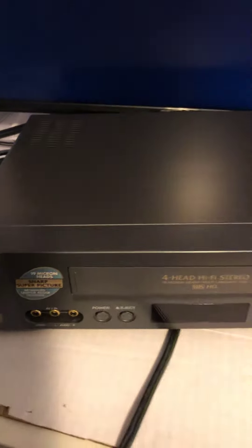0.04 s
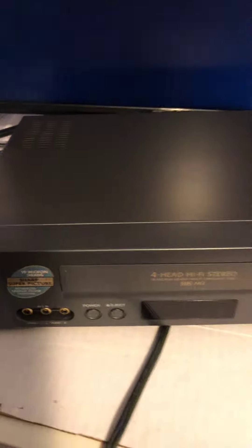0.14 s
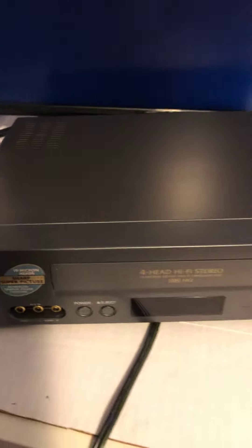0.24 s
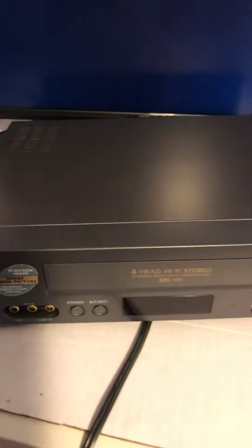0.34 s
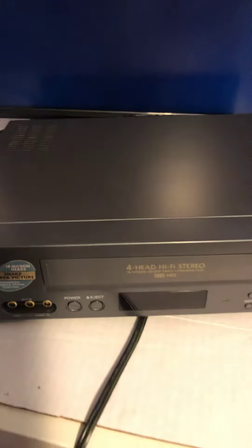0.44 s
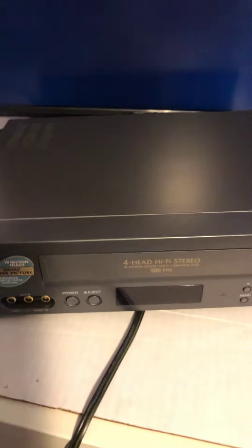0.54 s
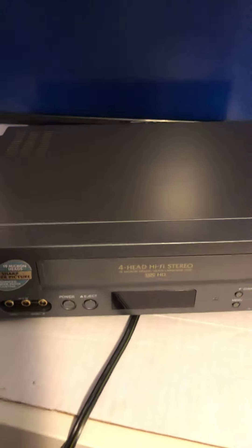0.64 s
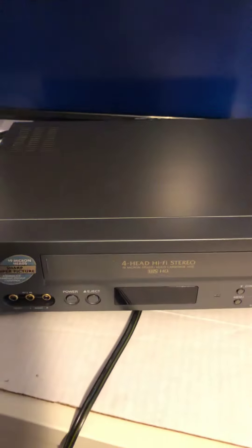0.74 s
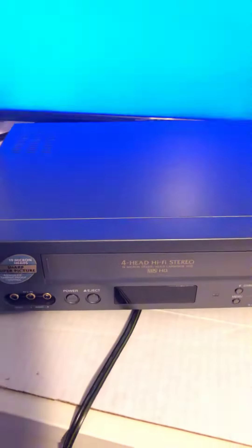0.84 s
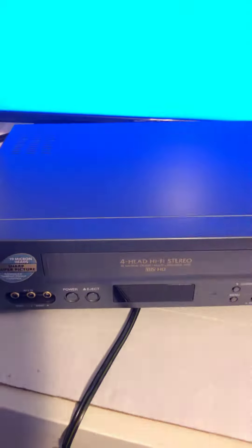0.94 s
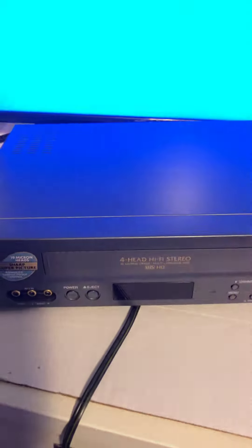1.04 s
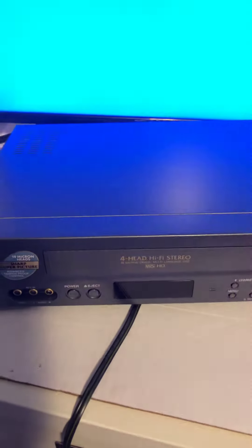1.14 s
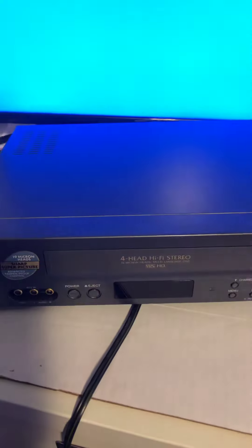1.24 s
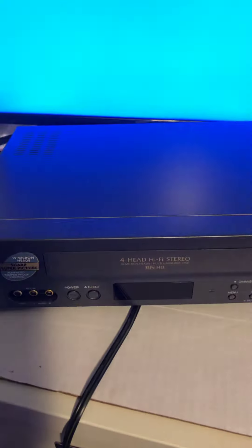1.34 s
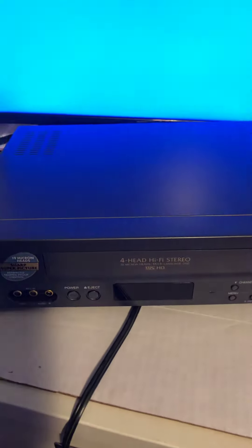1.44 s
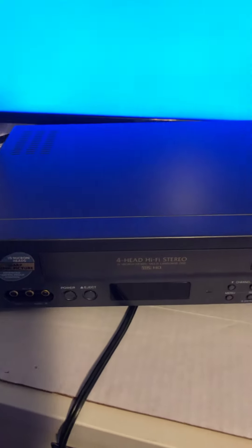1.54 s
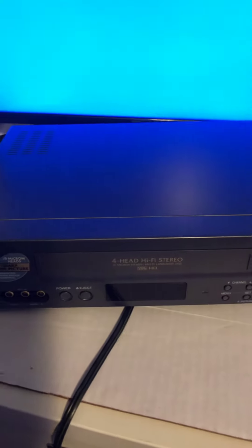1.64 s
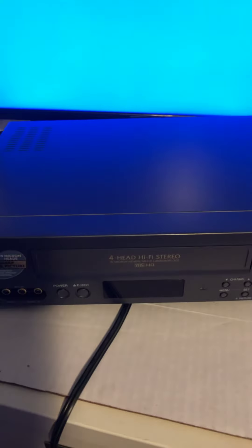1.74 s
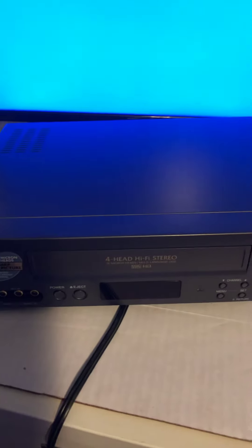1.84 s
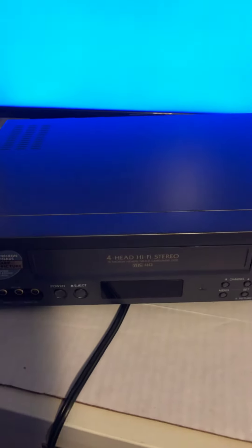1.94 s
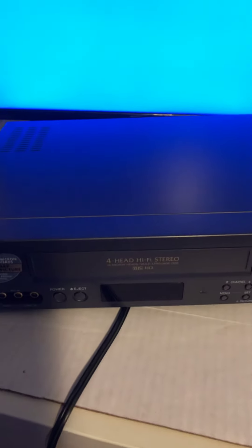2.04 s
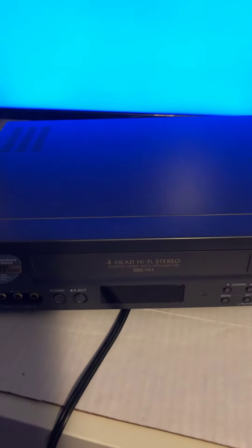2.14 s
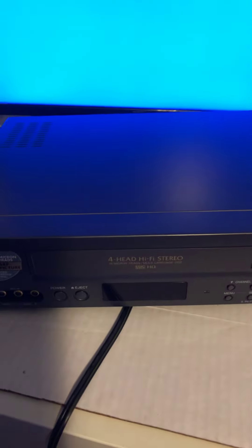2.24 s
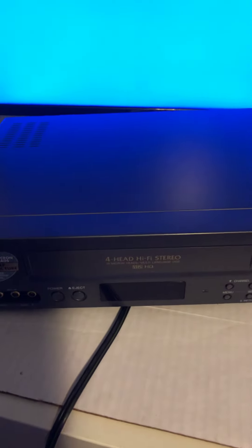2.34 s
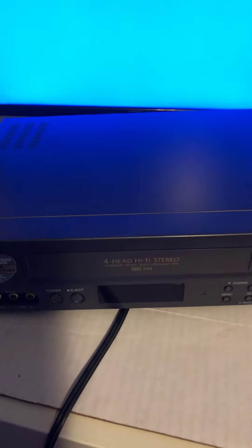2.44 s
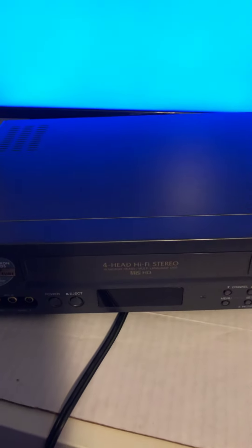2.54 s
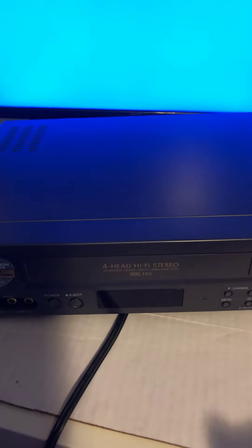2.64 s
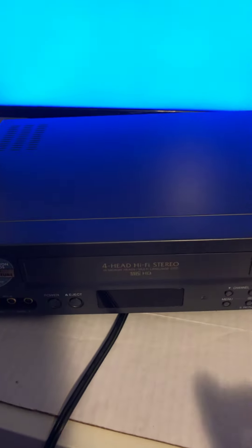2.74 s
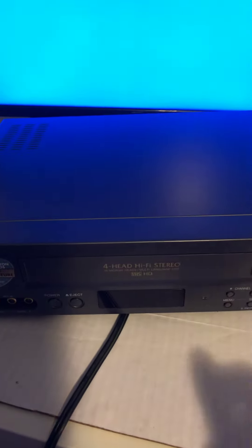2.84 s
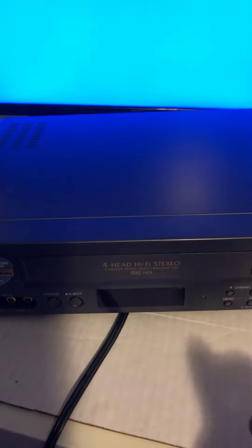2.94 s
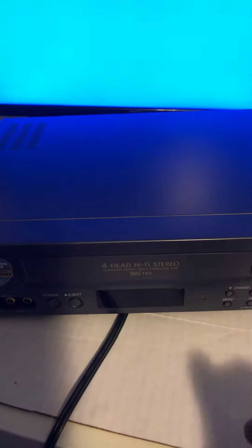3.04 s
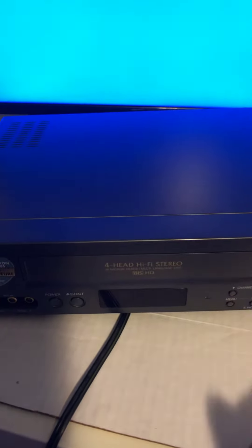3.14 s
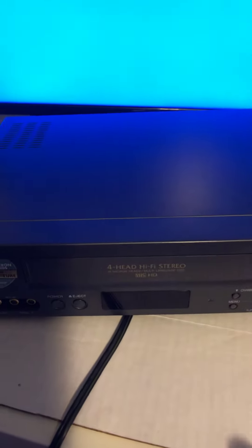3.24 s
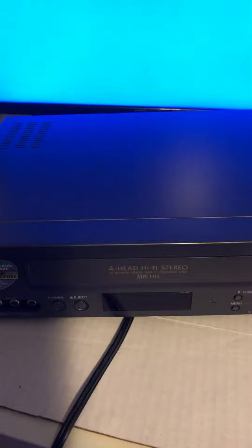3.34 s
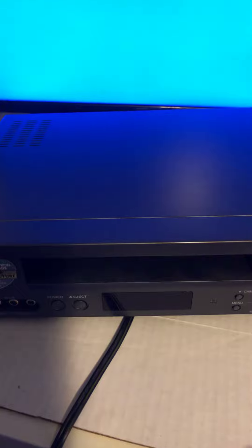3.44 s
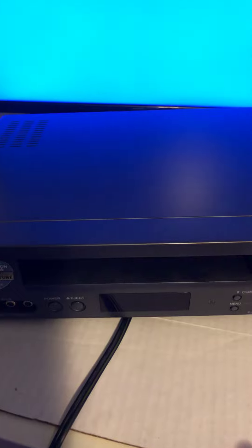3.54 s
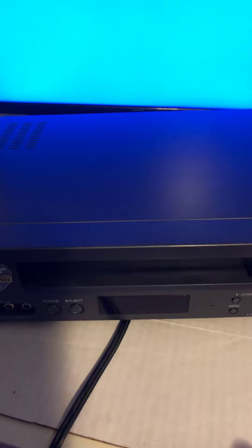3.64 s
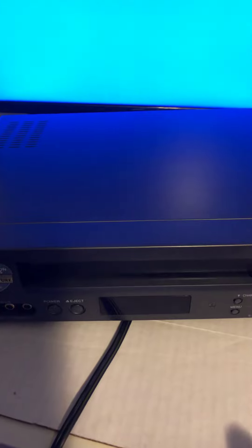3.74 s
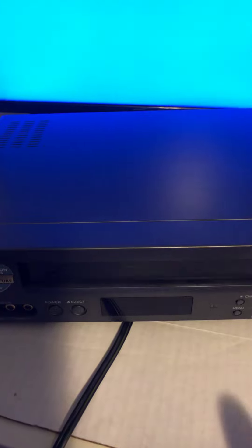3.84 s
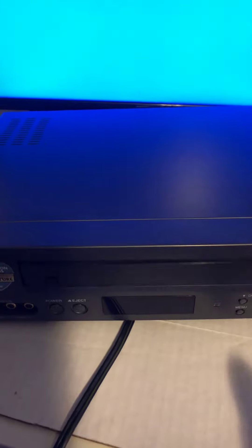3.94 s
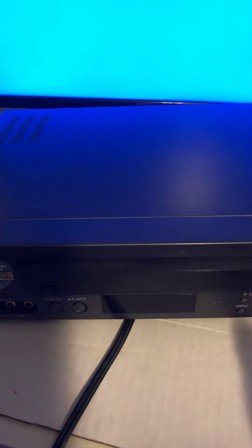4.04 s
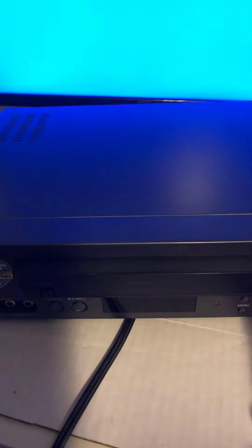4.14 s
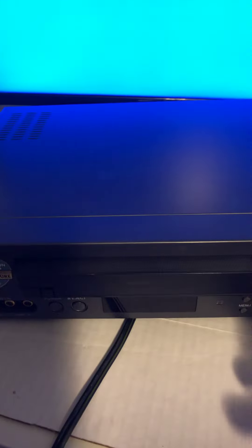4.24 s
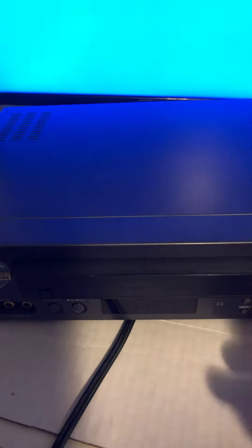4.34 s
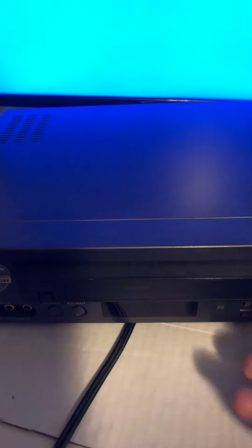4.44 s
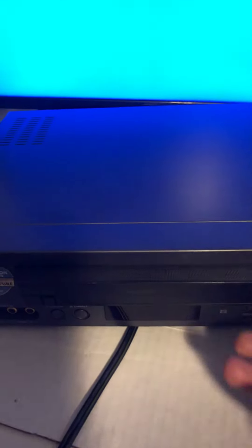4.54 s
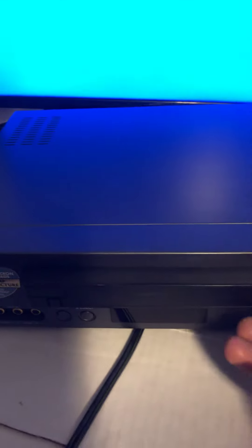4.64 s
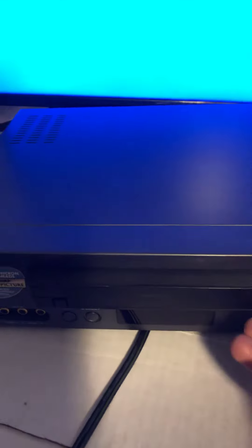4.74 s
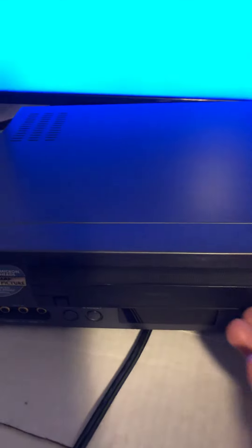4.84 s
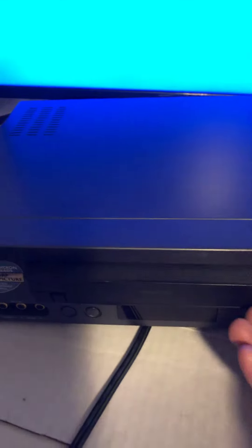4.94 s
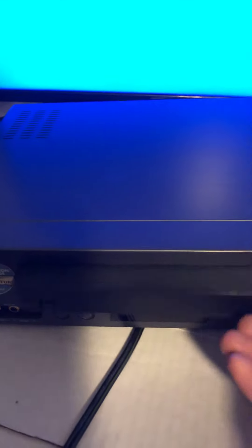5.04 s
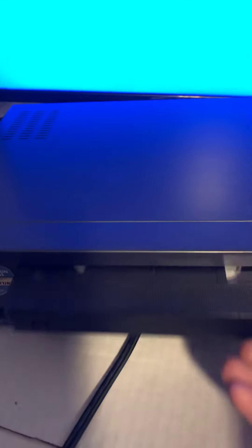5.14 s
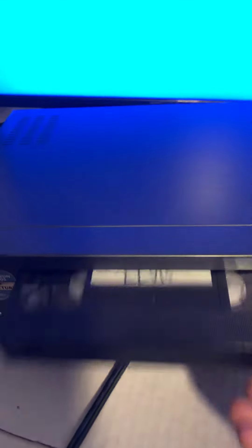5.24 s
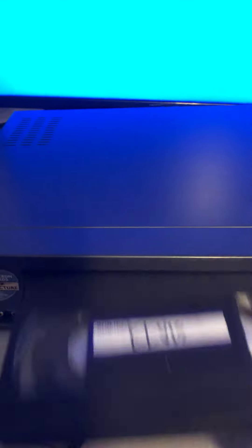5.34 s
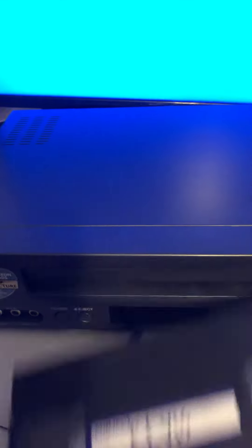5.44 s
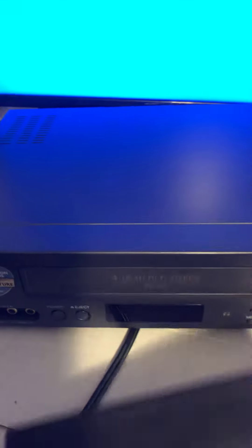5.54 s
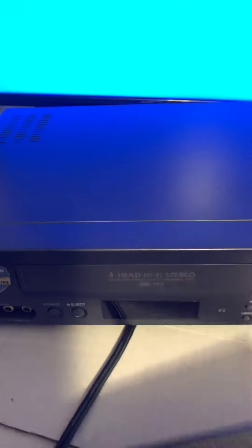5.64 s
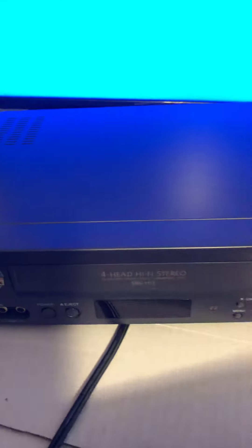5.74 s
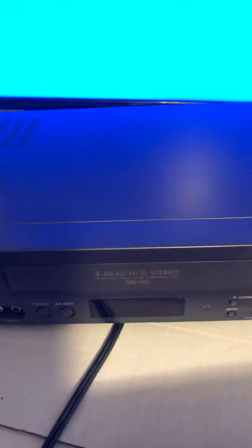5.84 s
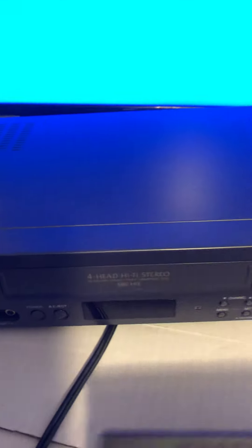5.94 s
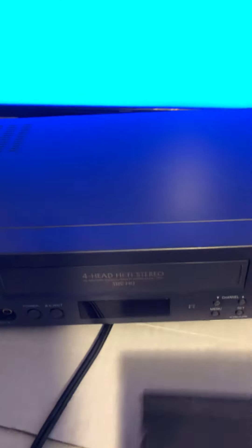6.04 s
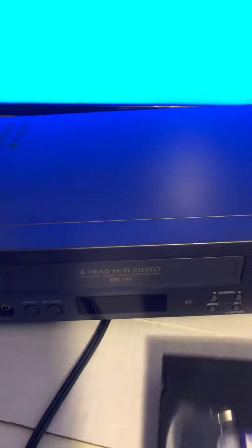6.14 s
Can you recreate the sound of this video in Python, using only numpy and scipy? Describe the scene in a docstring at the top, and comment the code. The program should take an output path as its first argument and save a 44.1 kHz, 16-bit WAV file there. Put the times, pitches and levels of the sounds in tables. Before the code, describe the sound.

A handheld microphone near a tape deck in a quiet room catches soft gear whir, small steel clicks and dull plastic knocks. The mechanism winds down, pauses, then ejects with a clatter, scraping and low thump. Another higher motor whir follows, then the cassette is dragged out and the flap cracks shut, by far the loudest moment, leaving faint hum and hiss.

```python
"""Video cassette deck ejecting

A deck unthreads its tape and ejects, over mains hum and hiss. Motors are sums of tones; gears are filtered noise.
Levers click, plastic parts knock and the door flap snaps: each blow is a chatter of taps ringing the steel chassis.
The carriage scrapes and a hand slides the cassette free: many tiny slips, each ringing the chassis briefly.
Low thumps are swells of deep noise, and a faint fuzzy tone comes near the end."""
import sys
import numpy as np
from scipy import signal
from scipy.fft import rfft, irfft
from scipy.io import wavfile
from scipy.ndimage import uniform_filter1d

SR = 44100
rng = np.random.default_rng(int(sys.argv[2]) if len(sys.argv) > 2 else 0)


def gain_from_db(level_db):
    """Turn a decibel level (scalar or array-like) into a linear amplitude factor."""
    decades = np.asarray(level_db, float) / 20
    return 10 ** decades


def transcribe(u):
    """Save the signal u as a 16-bit wav file named by the first command-line argument.

    u: samples, shape (n,) or (channels, n), limited to [-1, 1]; the rate is SR.
    q: integer samples, one column per channel.
    """
    v = np.clip(np.atleast_2d(u).T, -1, 1)
    q = np.round(v * 32767).astype(np.int16)
    wavfile.write(sys.argv[1], SR, q)


N = 272225  # length of the scene in samples


def evened(x):
    """Scales a sound to an rms of one."""
    return x / np.sqrt(np.mean(x ** 2) + 1e-20)


def read(points, hz):
    """Reads a curve of (f/Hz, value) points, straight on a log frequency scale."""
    f, value = np.transpose(points)
    return np.interp(np.log(hz + 1), np.log(f + 1), value)


def curve(rows):
    """Joins rows of (t/s, values ...) by straight lines; gives the start sample and one track per value."""
    s, *columns = np.transpose(rows)
    t = np.arange(s[0], min(s[-1], N / SR), 1 / SR)
    return round(s[0] * SR), [np.interp(t, s, c) for c in columns]


def add(mix, at, sound):
    """Adds a sound into the mix from sample `at`, cut off at the end of the mix."""
    part = mix[at:][:len(sound)]
    part += sound[:len(part)]


def coloured(x, points):
    """Filters a sound by a curve of (f/Hz, level/dB) points."""
    hz = np.fft.rfftfreq(len(x), 1 / SR)
    return irfft(rfft(x) * gain_from_db(read(points, hz)), len(x))


def wander(count, span_s):
    """Slow random drift with an rms of one: noise smoothed twice."""
    span = int(span_s * SR)
    once = uniform_filter1d(rng.standard_normal(count), span)
    return evened(uniform_filter1d(once, span))


def grains(count, per_s, spread_db, noise):
    """Sparse slips of uneven size in a bed of noise."""
    size = gain_from_db(spread_db * np.minimum(rng.exponential(1, count), 4)) * rng.standard_normal(count)
    slips = size * (rng.random(count) < per_s / SR)
    return evened(slips) + noise * rng.standard_normal(count)


def tones(lines, waver_db):
    """Lines of steady pitch, given as (f/Hz, level/dB), whose strength wavers."""
    t = np.arange(N) / SR
    out = np.zeros(N)
    for hz, db in lines:
        strength = np.sqrt(2) * gain_from_db(db + waver_db * wander(N, 0.13))
        out += strength * np.sin(2 * np.pi * (hz * t + rng.random()))
    return out


# colour of the hiss: f/Hz, level/dB (relative)
HISS_COLOUR = [(88, -40), (150, -38.5), (193, -0.5), (239, 1.5), (817, -8), (1050, -27), (1680, -9),
               (2430, -11.5), (2840, -12.5), (15800, -21.5)]


def hiss():
    """Steady noise, coloured and held at one level."""
    level_db = -72
    return gain_from_db(level_db) * evened(coloured(rng.standard_normal(N), HISS_COLOUR))


# mains tone: f/Hz, level/dB (before wavering)
MAINS_TONE = [(119.9, -70)]


def hum():
    """The mains hums on a steady pitch, wavering slightly in strength."""
    return tones(MAINS_TONE, waver_db=0.6)


# low thumps through the shelf: t/s (of the peak), level/dB, f/Hz (around the middle of the band)
THUMPS = [(0.24, -53, 140), (1.07, -54, 150), (1.6, -59, 170), (2.1, -73, 70), (2.27, -71, 70),
          (2.97, -78, 60), (3.21, -57, 70), (3.35, -61, 170), (3.64, -46.5, 65), (3.76, -66, 100),
          (4.11, -57, 75.5), (5.03, -65, 80), (5.17, -51.5, 90), (5.3, -50.5, 112), (5.43, -45.5, 89),
          (5.56, -62, 75)]


def bumps():
    """Lumpy low rumble, and a swell of deep noise at each thump."""
    rise_s, fall_s, rumble_db = 0.028, 0.045, -75  # the times are for growing or fading by a factor e
    noise, t = rng.standard_normal(N), np.arange(N) / SR
    low = coloured(noise, [(20, -40.0), (50, -1.5), (90, -8.5), (160, -13), (400, -41), (2000, -89.0)])
    out = gain_from_db(rumble_db + 4.6 * wander(N, 0.041)) * evened(low)
    for s, db, hz in THUMPS:
        band = coloured(noise, [(hz / 3.0, -40), (hz / 1.4, 0), (hz * 1.28, 0), (hz * 5.4, -40), (hz * 20, -90)])
        swell = np.exp(np.minimum((t - s) / rise_s, (s - t) / fall_s))
        out += gain_from_db(db) * swell * evened(band)
    return out


# loudness of the turning gear train: t/s, level/dB
GEAR_LEVEL = [(0.0, -63.5), (0.14, -65.5), (0.55, -65.5), (0.84, -66.5), (1.1, -62.5), (2.25, -64),
              (2.54, -70.5), (2.89, -72.5), (3.22, -73.5), (3.42, -59), (3.9, -57.5), (4.02, -57),
              (4.24, -68.5), (4.61, -61), (4.95, -64), (5.65, -65), (5.86, -75.5), (6.18, -72)]
# colour of the tooth noise: f/Hz, level/dB (relative)
TOOTH_COLOUR = [(80, -35.5), (130, 2.5), (300, 1), (400, -3), (600, 0), (900, -2), (1150, -5.5), (1450, -6),
                (1580, -12), (1700, -11), (2400, -13.5), (5300, -17), (12000, -29), (16000, -62)]
# resonances of the deck: f/Hz, width/Hz, level/dB (before the 0.5 dB cut in gears)
DECK_PEAKS = [(314, 161, -3.5), (598, 85, -11.5), (1018, 33, -1.5), (1306, 29, 3.5), (1525, 19, 5.5)]


def gears():
    """Tooth noise of the gear train through the resonances of the deck."""
    hz = np.fft.rfftfreq(N, 1 / SR)
    peaks = 1 + sum(gain_from_db(db - 0.5) / (1 + (2 * (hz - f) / w) ** 2) for f, w, db in DECK_PEAKS)
    teeth = coloured(grains(N, per_s=1500, spread_db=0.94, noise=1.0), TOOTH_COLOUR)
    teeth = teeth * gain_from_db(2.36 * wander(N, 0.021))
    level_db = np.resize(curve(GEAR_LEVEL)[1][0], N)
    return gain_from_db(level_db) * evened(irfft(rfft(teeth) * peaks, N))


# head drum lines, with the capstan's line at 1077 Hz: f/Hz, level/dB (before wavering and the lift and rise in
# drum)
DRUM_LINES = [(238.6, -84.5), (477.2, -84.5), (716, -89), (954.4, -83.5), (1017, -87.5), (1077, -84),
              (1270, -87.5), (1437, -82)]


def drum():
    """The head drum and capstan sing, rising slowly in level, until switched off, then fade fast."""
    lift_db, stop_s, sag_db_per_s, stop_db_per_s = 4.0, 2.17, -0.4, 90  # a negative sag is a slow rise
    t = np.arange(N) / SR
    level_db = lift_db - sag_db_per_s * t - stop_db_per_s * np.maximum(t - stop_s, 0)
    return tones(DRUM_LINES, waver_db=3.4) * gain_from_db(level_db)


# loading motor, one list per run: t/s, f/Hz (commutator, before wavering), level/dB (before the order's own)
LOADER_RUNS = [
    [(0, 283.8, -79), (.2, 286.6, -69), (.45, 286, -84)],
    [(.88, 280.6, -74), (1.2, 289, -73.5), (1.45, 290, -70), (1.62, 301.2, -76), (2.2, 298.6, -73),
     (2.4, 320, -78.5), (2.6, 339, -88)],
    [(3.5, 308, -104.5), (3.62, 312.2, -65), (3.8, 304.2, -67), (4.05, 309, -93), (4.2, 305, -78)],
    [(4.38, 363, -77), (4.6, 365.3, -77.5), (4.98, 361.4, -76.5)],
]
# strength of each commutator order: multiple of the commutator pitch, level/dB (before wavering)
MOTOR_ORDERS = [(1, 6.5), (2, 1.5), (3, -15), (4, -23), (5, -18)]


def loader(rows):
    """Commutator orders of a small motor whose speed sags under load."""
    at, (hz, db) = curve(rows)
    turns = np.cumsum(hz * (1 + 0.0083 * wander(len(hz), 0.01))) / SR
    orders = np.zeros(len(hz))
    for multiple, level_db in MOTOR_ORDERS:
        strength = gain_from_db(level_db + 2.0 * wander(len(hz), 0.045))
        orders += strength * np.sin(2 * np.pi * multiple * turns)
    return at, np.sqrt(2) * gain_from_db(db) * orders * signal.windows.tukey(len(hz), .1)


# a faint fuzzy tone near the end: t/s, level/dB
FUZZY_TONE = [(5.68, -99), (5.8, -83), (6.17, -95)]


def whine():
    """A narrow band of noise, heard as a fuzzy tone."""
    centre_hz, width_hz = 2350, 180
    at, (db,) = curve(FUZZY_TONE)
    hz = np.fft.rfftfreq(len(db), 1 / SR)
    resonance = 1 / (1 + (2 * (hz - centre_hz) / width_hz) ** 2)
    band = irfft(rfft(rng.standard_normal(len(db))) * resonance, len(db))
    return at, gain_from_db(db) * evened(band)


# modes of the steel chassis, before random spread: f/Hz, level/dB (relative), t60/s (time to fade by 60 dB)
CHASSIS_MODES = [(200.7, 11.5, 0.061), (317, 5, 0.2), (444, 7.5, 0.09), (484, -13, 0.36), (651, -9, 0.55),
                 (850, -19.5, 0.31), (1015, 6, 0.0422), (1170, -14, 0.03), (1360, -2.5, 0.04),
                 (1680, -17, .08), (2330, 7, 0.011), (2518, -11.5, 0.027), (2970, -24, 0.067),
                 (3900, -12, 0.078), (4040, -12, 0.036), (5270, -18, 0.03), (5600, -3, 0.137),
                 (5890, 1, .08), (7670, -2, 0.073)]
# dying of the dense ring in case and room: f/Hz, t60/s
DENSE_RING = [(60, 0.62), (300, 0.15), (1000, 0.22), (4000, 0.22), (12000, 0.18)]


def ringing(near_hz, t, focus_db, modes_db):
    """What the chassis answers to one tap: modes, strongest near the struck part, and a dense dying ring."""
    hz, db, t60 = np.transpose(CHASSIS_MODES)[:, :, None]
    luck = rng.standard_normal((len(CHASSIS_MODES), 2))  # each tap excites and tunes the modes a little differently
    db = db + 4.2 * luck[:, :1] - focus_db * np.minimum(abs(np.log2(hz / near_hz)), .6)
    tuned_hz = hz * (1 + 0.0083 * luck[:, 1:])
    modes = (gain_from_db(db - 60 * t / t60) * np.sin(2 * np.pi * tuned_hz * t)).sum(0)
    # noise whose every frequency fades at its own pace
    f, s, z = signal.stft(rng.standard_normal(len(t)), SR, nperseg=128)
    fade = gain_from_db(-60 * s / read(DENSE_RING, f)[:, None])
    dense = signal.istft(z * fade, SR, nperseg=128)[1][:len(t)]
    burst = 1 + 5.57 * gain_from_db(-60 * t / 0.005)
    # the struck part itself; small bright parts die sooner
    own_t60 = .06 * np.sqrt(1000 / near_hz)
    own = gain_from_db(-60 * t / own_t60) * np.sin(2 * np.pi * near_hz * t)
    return evened(dense) * burst + gain_from_db(modes_db) * evened(modes) + .3 * evened(own)


# colour of rubbing parts: f/Hz, level/dB (relative)
RUB_COLOUR = [(24, -44), (40, -19), (96, -12.5), (213, -7), (325, 1.5), (387, -7), (859, 1.5), (1160, -12),
              (1490, -3), (1820, -14.5), (6000, -30), (15500, -41)]


def slide(rows):
    """Uneven slips each ring the chassis briefly, in clumps; rows are (t/s, level/dB, treble lift/dB)."""
    at, (db, lift_db) = curve(rows)
    count = len(db)
    t = np.arange(3000) / SR
    patch = rng.integers(0, 14, count)  # which of 14 pitches each slip rings
    slips = grains(count, per_s=3000, spread_db=1.8, noise=.4) * gain_from_db(2.0 * wander(count, .01))
    rub = np.zeros(count)
    for k, hz in enumerate(np.geomspace(300, 4000, num=14)):
        answer = ringing(hz, t, focus_db=6.0, modes_db=-4.0) * gain_from_db(-60 * t / .06)
        rub += signal.fftconvolve(slips * (patch == k), answer)[:count]
    rub = evened(coloured(rub, RUB_COLOUR))
    low = signal.sosfilt(signal.butter(1, 1200, fs=SR, output="sos"), rub)
    treble = rub - low
    return at, gain_from_db(db) * (low + gain_from_db(lift_db) * treble) * signal.windows.tukey(count, .04)


# carriage and flap scraping in their guides after a jolt, and at 5.399 s the long dull tail of the flap's
# clunk: # t/s (start), level/dB (before treble lift), hold/s, t60/s, treble lift/dB
GUIDE_SCRAPES = [(3.173, -67, .02, 0.08, 12), (3.192, -44, 0.0099, 0.25, -15),
                 (3.287, -50.5, 0.0031, 0.46, -9), (3.36, -54.5, 0.012, 0.091, 7),
                 (3.44, -63.5, 0.08, .12, 11.5), (3.558, -45, 0.057, 0.45, 4.5),
                 (3.769, -59.5, 0.053, 0.18, 9), (3.961, -62.5, 0.12, 0.22, 12),
                 (5.399, -44.5, 0.021, 0.66, -12), (5.415, -48.5, 0.0037, 0.044, -1),
                 (5.484, -40, .004, 0.16, -1), (5.556, -48.5, 0.063, 0.33, -10)]


def scrape(s, db, hold_s, t60, lift_db):
    """A part scrapes in its guide: quick rise, hold, then an even fade."""
    rise_s, depth_db = 0.011, 24.5
    times = s + np.cumsum([0, rise_s, max(hold_s, 1e-3), t60 * depth_db / 60])
    return slide([(at, db - drop * depth_db, lift_db) for at, drop in zip(times, (1, 0, 0, 1))])


# the hand draws the cassette out: t/s, level/dB (before treble lift), treble lift/dB
CASSETTE_PULL = [(4.96, -63, 7), (5.01, -54.5, 3), (5.054, -43, 2.5), (5.15, -46.5, 7.5), (5.22, -46, 9.5),
                 (5.28, -47.5, 12.5), (5.364, -38.5, -6.5), (5.4, -41, -1)]


def pull():
    """The cassette rubs its way out as the hand draws it."""
    return slide(CASSETTE_PULL)


def blow(crack_db, thud_db, clack_db, tick_db, near_hz, bounce_s):
    """A part lands and chatters; treble arrives at once, the bass of the case swells later.

    Thud, clack and tick are in dB above the crack."""
    t = np.arange(int(.35 * SR)) / SR
    chatter = grains(count=2000, per_s=1500, spread_db=-1.0, noise=0.11)
    chatter = chatter * np.exp(-(t[:2000] / max(bounce_s, 1e-4)) ** 2)
    chatter[0] = abs(chatter).max()  # the first contact is the hardest
    x = signal.fftconvolve(ringing(near_hz, t, focus_db=14.0, modes_db=-11.5), chatter)[:len(t)]
    # small bright parts crack at their own pitch
    crack_hz = near_hz if near_hz > 2000 else 4000
    centres_hz = [40, 110, 400, 1100, crack_hz, 8000, 12000, 16000]
    layers = (([-60, -9, 0, -12, -45, -60, -60, -60], thud_db, .006),  # shape/dB, level/dB, rise/s
              ([-60, -45, -14, 0, -14, -40, -60, -60], clack_db, .003),
              ([-60, -60, -40, -9, 0, -7, -18, -28], 0, .001),  # the crack
              ([-60, -60, -60, -45, -24, -8, 0, 0], tick_db, .0007))
    out = np.zeros(len(t))
    for shape_db, db, rise_s in layers:
        band = coloured(x, list(zip(centres_hz, shape_db))) * (1 - np.exp(-(t / rise_s) ** 2))
        loudest = np.sqrt(uniform_filter1d(band ** 2, size=220).max())  # rms over about 5 ms
        out += gain_from_db(crack_db + db) * band / loudest
    return out * np.cos(t / t[-1] * np.pi / 2)


# plastic parts knocking, dull:
# t/s, level/dB (clack), thud level/dB (above the clack), f/Hz (rung most), time spent bouncing/s
PLASTIC_KNOCKS = [(0.4597, -67, 21.5, 606, 0.0026), (0.719, -69, 13.5, 245, 0.011),
                  (2.0265, -61, -2, 757, 0.071), (2.072, -53, -13, 550, 0.018),
                  (3.2946, -51, -19, 1070, 0.018), (3.35, -63, 10, 800, 0.012),
                  (3.3791, -60, 11.5, 624, 0.0014), (3.3989, -76.5, 24, 186, 0.0026),
                  (3.5482, -47.5, -23, 1025, 0.037), (4.43, -69.5, 5, 406, 0.017),
                  (4.77, -63.5, 1.5, 700, 0.017), (4.8207, -73.5, 15.5, 335, 0.0043),
                  (5.009, -61, 16, 246, 0.0051), (5.053, -66.5, 16, 277, 0.014),
                  (5.1163, -47.5, 6, 352, 0.011), (5.1732, -42, -20, 880, 0.0085),
                  (5.2179, -55, 17.5, 314, 0.013), (5.258, -39.5, -14.5, 320, 0.015),
                  (6.0684, -88, 26, 137, 0.012)]


def knocks(deck):
    """Plastic parts knock dully: the clack is strong, the crack weak."""
    crack_db, tick_db = -20.5, -26.5  # crack above the clack, tick above the crack
    for s, db, thud_db, hz, bounce_s in PLASTIC_KNOCKS:
        add(deck, round(s * SR), blow(db + crack_db, thud_db - crack_db, -crack_db, tick_db, hz, bounce_s))


# steel levers and latches, sharp:
# t/s, level/dB (crack), thud level/dB (above the crack), f/Hz (rung most), time spent bouncing/s
STEEL_CLICKS = [(0.1806, -55, 16.5, 282, 0.0044), (0.905, -59, 7.5, 5640, 0.022),
                (0.93, -60.5, 7.5, 484, 0.0041), (1.038, -41, -1, 490, 0.03),
                (1.0726, -59.5, 20, 310, 0.019), (1.3713, -60, -8, 5200, 0.053),
                (1.3902, -57, -20, 3550, 0.014), (1.5265, -55.5, 6, 813, 0.015),
                (1.5937, -59.5, 8, 795, 0.02), (1.9424, -62, 0, 280, 0.0046),
                (2.3126, -52.5, -1.5, 5260, 0.024), (3.1989, -49, -3.5, 436, 0.01),
                (3.431, -58.5, -1, 970, 0.036), (3.455, -54.5, -12, 2300, 0.026),
                (3.566, -43.5, -3.5, 303, 0.038), (3.5988, -46, 3, 300, 0.0067),
                (3.6274, -52, 5.5, 162, 0.012), (3.6554, -48, -4, 3800, 0.022),
                (3.796, -66, 10.5, 283, 0.059), (3.9688, -63.5, 6, 4030, 0.015),
                (4.0098, -64.5, 10, 3400, 0.011), (4.0939, -53, 13.5, 298, 0.022),
                (4.2363, -59, 5, 405, 0.0045), (4.6214, -52.5, 1, 4360, 0.0037),
                (5.289, -43.5, -21, 2400, 0.0089), (5.3308, -43, 4, 3530, 0.015),
                (5.3532, -47.5, -21, 2420, 0.051)]


def clicks(deck):
    """Steel levers and latches land sharply, with a strong crack."""
    clack_db, tick_db = -5.5, -27.5  # above the crack
    for s, db, thud_db, hz, bounce_s in STEEL_CLICKS:
        add(deck, round(s * SR), blow(db, thud_db, clack_db, tick_db, hz, bounce_s))


# the door flap snaps shut and rebounds:
# t/s, level/dB (crack), thud level/dB and clack level/dB (above the crack), f/Hz (rung most)
FLAP_BLOWS = [(5.4004, -24.5, -3.5, -17.5, 3460), (5.4324, -50.5, 4, -1.5, 420), (5.4898, -46, -5, 6, 1006),
              (5.5638, -50.5, -13, 8, 1005), (5.6145, -60, 2, 6, 310)]


def flap(deck):
    """The door flap snaps shut, then rebounds in weaker blows with more tick for their crack."""
    snap_tick_db, rebound_tick_db, bounce_s = -8.5, 0, 0.0081  # ticks are above the crack
    for s, db, thud_db, clack_db, hz in FLAP_BLOWS:
        tick_db = rebound_tick_db if s > FLAP_BLOWS[0][0] else snap_tick_db
        add(deck, round(s * SR), blow(db, thud_db, clack_db, tick_db, hz, bounce_s))


def scene():
    """Lays the moving parts over the steady sounds, as one channel."""
    deck = hiss() + hum() + bumps() + gears() + drum()
    for rows in LOADER_RUNS:
        add(deck, *loader(rows))
    add(deck, *whine())
    for row in GUIDE_SCRAPES:
        add(deck, *scrape(*row))
    add(deck, *pull())
    knocks(deck)
    clicks(deck)
    flap(deck)
    return deck[None]


def band_limit(x):
    """A steep low-pass at the top of the band."""
    return signal.sosfilt(signal.butter(12, 16470, fs=SR, output="sos"), x)


def record(dry):
    """The microphone drops the deep bass and the top."""
    thin = signal.sosfilt(signal.butter(2, 40, "high", fs=SR, output="sos"), dry)
    top_cut = signal.firwin(255, 16000, window=("kaiser", 5), fs=SR)
    thin = signal.oaconvolve(thin, top_cut[None], "same")
    return band_limit(thin)


dry = scene()
out = record(dry)
transcribe(out)
```